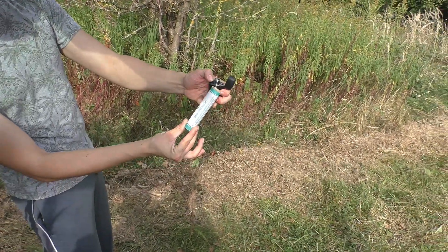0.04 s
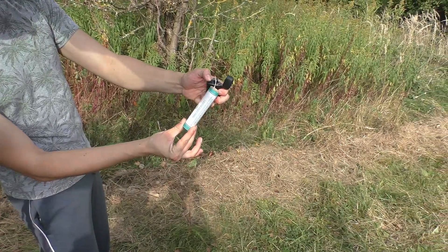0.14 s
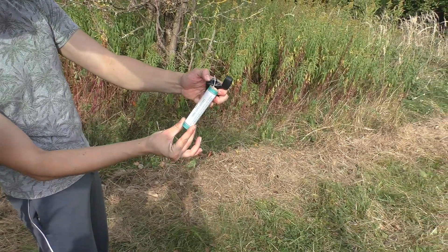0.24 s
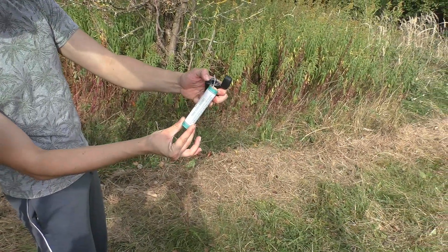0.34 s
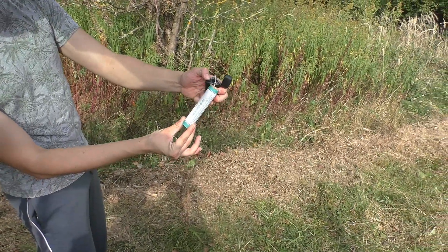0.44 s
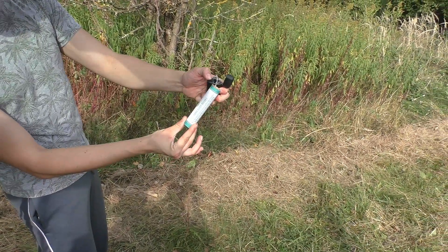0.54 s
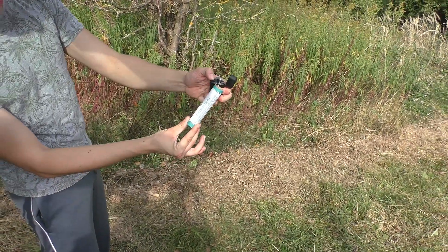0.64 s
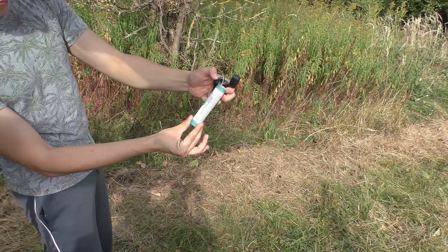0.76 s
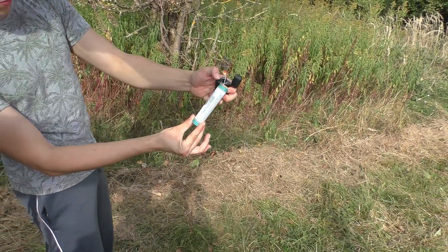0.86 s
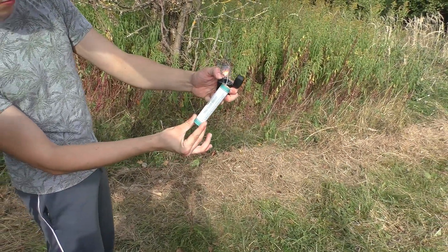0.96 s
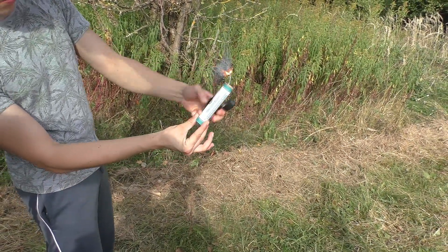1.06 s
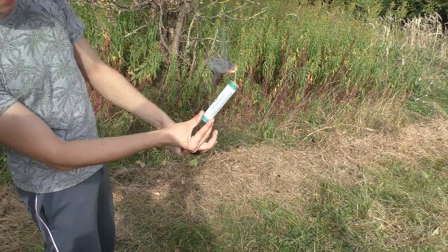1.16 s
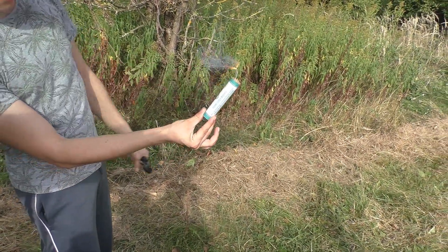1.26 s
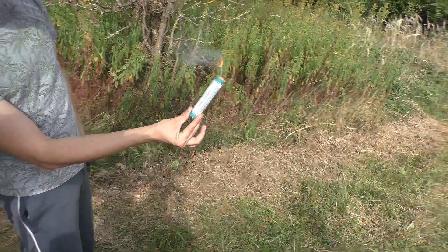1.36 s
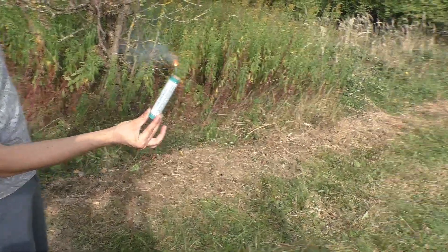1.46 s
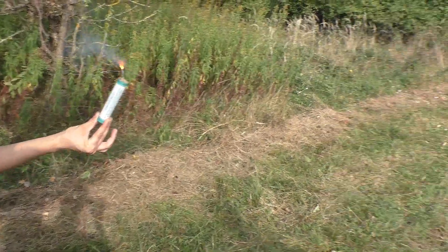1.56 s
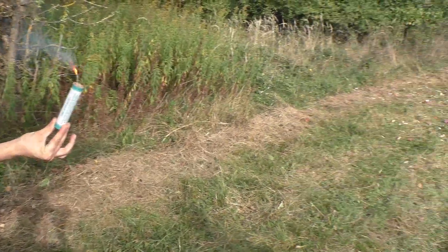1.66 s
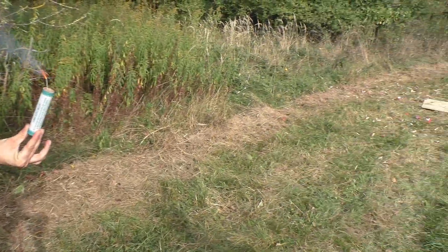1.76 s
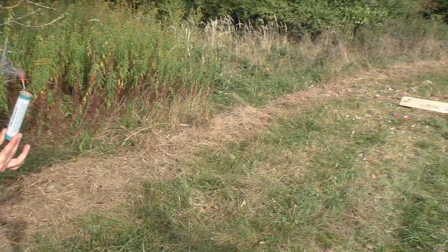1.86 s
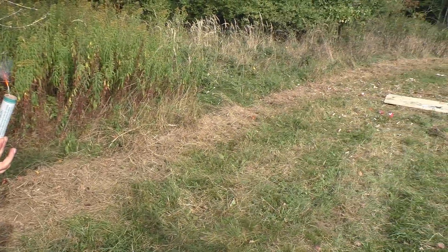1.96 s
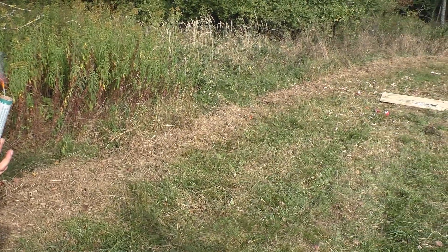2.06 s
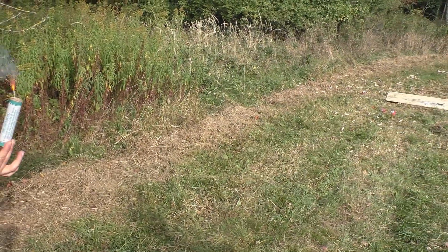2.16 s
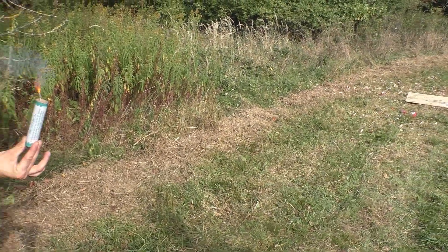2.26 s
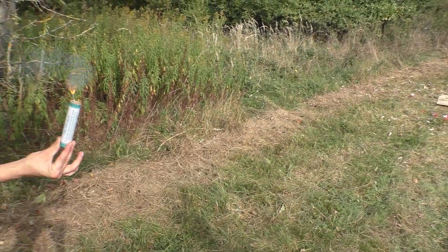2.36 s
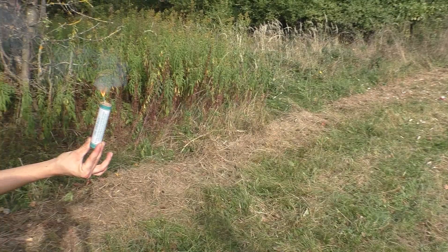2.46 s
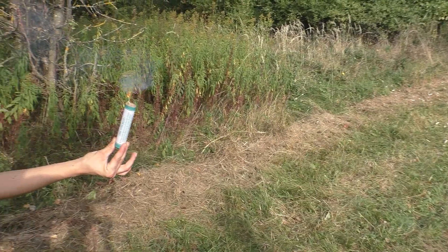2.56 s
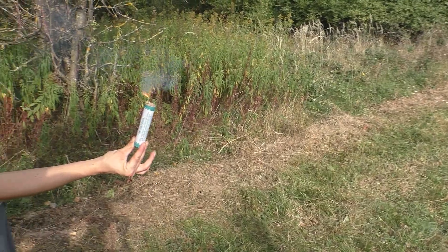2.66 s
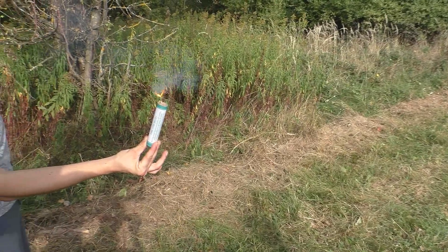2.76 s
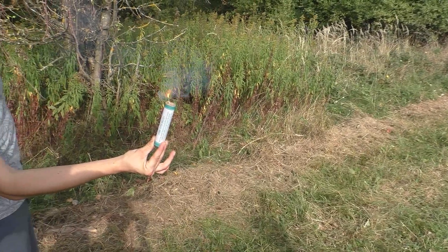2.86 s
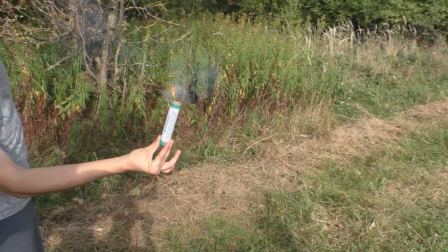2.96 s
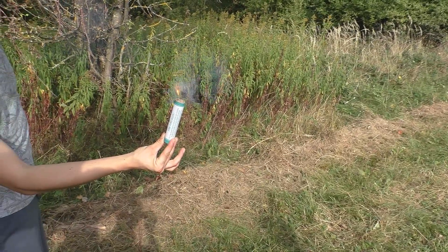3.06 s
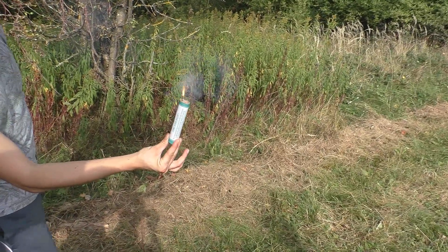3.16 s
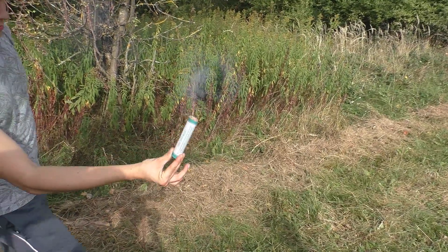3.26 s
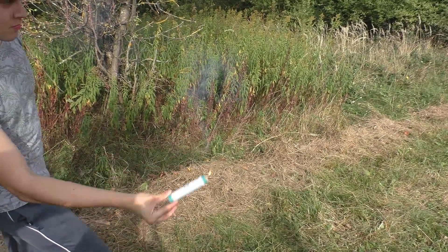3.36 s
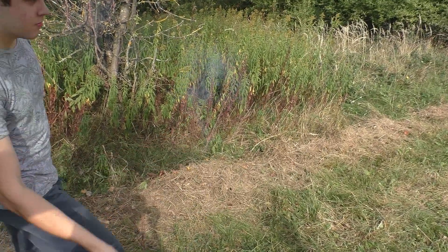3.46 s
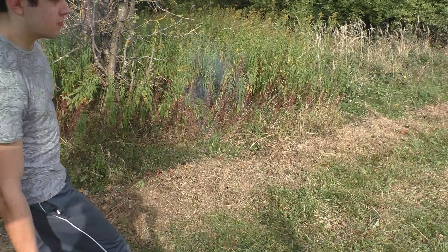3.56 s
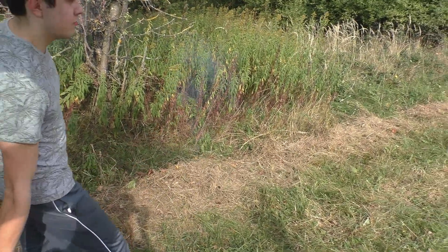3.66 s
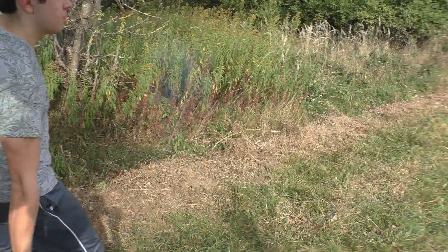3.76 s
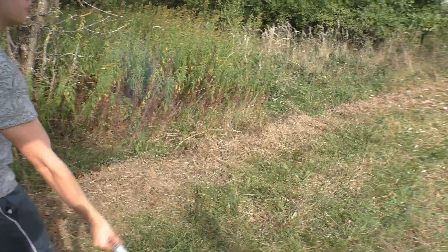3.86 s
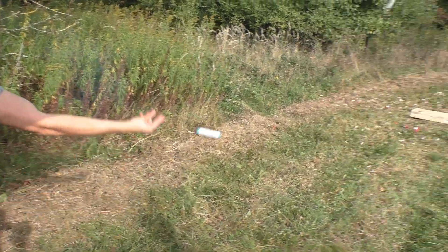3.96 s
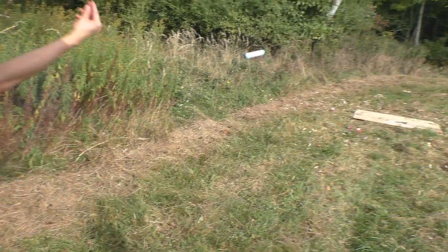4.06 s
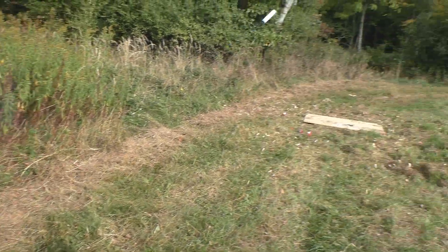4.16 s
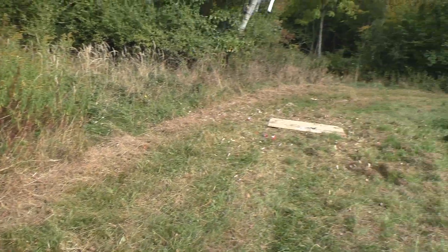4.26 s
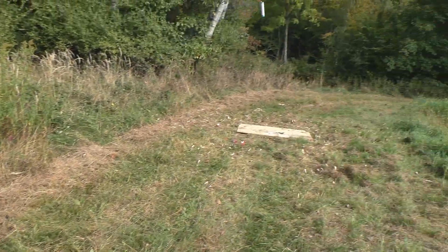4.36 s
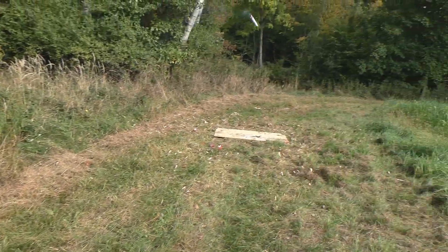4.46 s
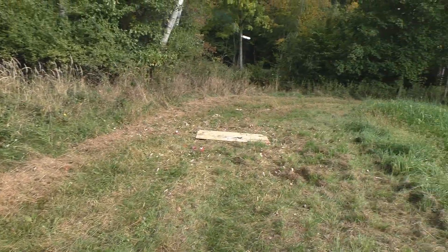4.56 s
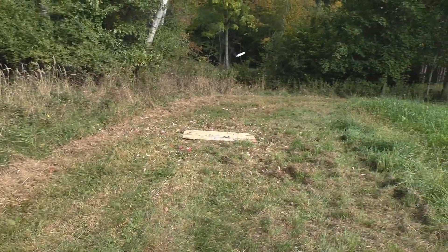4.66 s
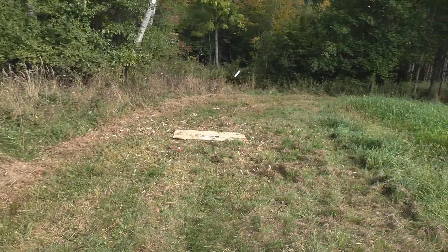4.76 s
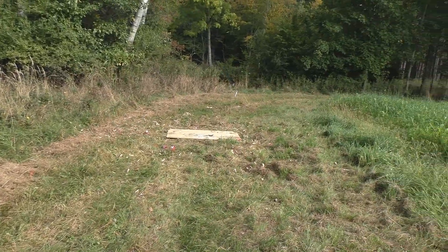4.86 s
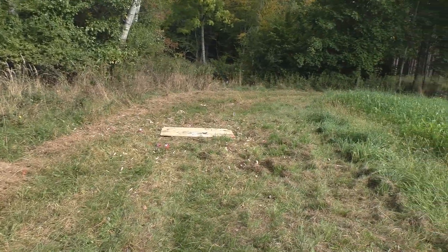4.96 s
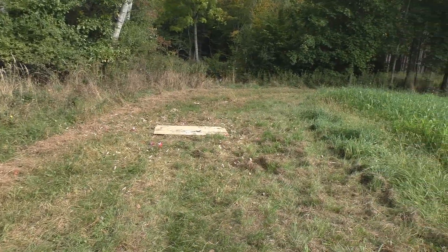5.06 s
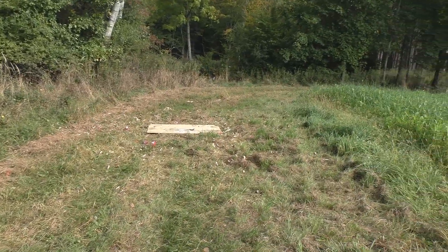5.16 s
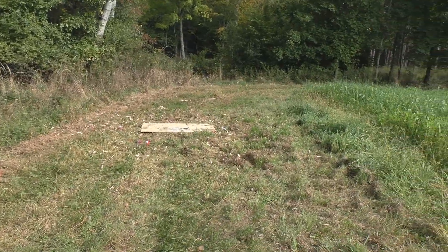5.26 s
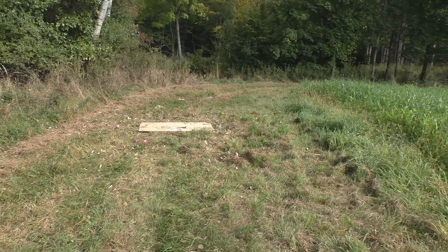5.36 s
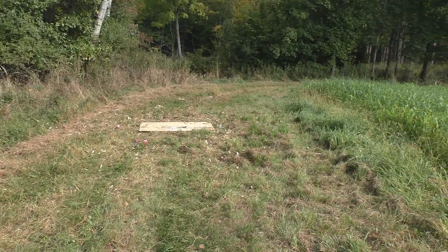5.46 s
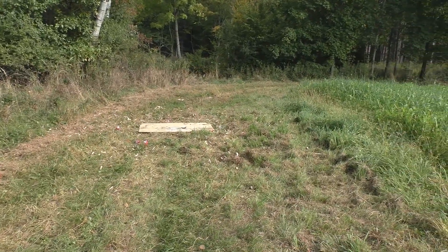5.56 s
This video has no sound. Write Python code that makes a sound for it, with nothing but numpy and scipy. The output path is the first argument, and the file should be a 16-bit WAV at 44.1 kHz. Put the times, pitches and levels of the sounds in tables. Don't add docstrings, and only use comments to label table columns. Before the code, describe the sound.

Close, dry camera sound of a hand-held firecracker being lit: one hard metallic click, a breathy torch-like rush, then a fizzing fuse with a fine sputter. The hiss has a hollow, shifting colour from a nearby reflection. After a deep whoosh from the swing it thins quickly, moving away. Grass and stems crunch underfoot, then a short low knock on earth, leaving faint hiss and field air.

```python
import sys
import numpy as np
from scipy import signal
from scipy.io import wavfile
from scipy.ndimage import uniform_filter1d

SR = 44100
rng = np.random.default_rng(int(sys.argv[2]) if len(sys.argv) > 2 else 0)


def file_out(sig):
    cols = np.atleast_2d(sig).T
    lim = np.clip(cols, -1, 1)
    pcm = np.round(lim * 32767).astype(np.int16)
    wavfile.write(sys.argv[1], SR, pcm)


def ratio_of_db(decibels):
    return 10 ** (np.asarray(decibels, float) / 20)


N = 247702


def evened(x):
    return x / np.sqrt(np.mean(abs(x) ** 2) + 1e-20)


def read(points, hz):
    f, *columns = np.transpose(points)
    return [np.interp(np.log(hz + 1), np.log(f + 1), c)[:, None] for c in columns]


def follow(rows, t):
    s, *columns = np.transpose(rows)
    return [np.interp(t, s, c) for c in columns]


def add(mix, s, sound, pan_db=0):
    part = mix[:, round(s * SR):][:, :len(sound)]
    part += sound[:part.shape[1]] * ratio_of_db(np.array([[.5], [-.5]]) * pan_db)


def band(x, lo_hz, hi_hz):
    return signal.sosfilt(signal.butter(2, [lo_hz, min(hi_hz, .45 * SR)], "bandpass", fs=SR, output="sos"), x)


def decaying(hz, db, t60, t):
    return ratio_of_db(db - 60 * t / t60) * np.sin(2 * np.pi * hz * t)


def to_sound(spectra):
    return signal.istft(spectra, SR, nperseg=1024, noverlap=768)[1][:, :N]


def turbulence(flicker_db, patchy_db, pops_per_s, pop_db):
    quick = evened(uniform_filter1d(rng.standard_normal(N), 150))
    flicker = quick + evened(uniform_filter1d(rng.standard_normal(N), 1500))
    pops = ratio_of_db(pop_db + 3.8 * np.minimum(rng.exponential(1, N), 2.2))
    pops = pops * (rng.random(N) < pops_per_s / SR)
    gust = ratio_of_db(flicker_db * flicker) + signal.lfilter([1], [1, -.93], pops)
    noise = rng.standard_normal((2, N)) * evened(gust)
    hz, t, z = signal.stft(noise, SR, nperseg=1024, noverlap=768)
    patches = uniform_filter1d(uniform_filter1d(rng.standard_normal(z.shape[::-1][:2]).T, 14, 0), 10, 1)
    return hz, t, z * ratio_of_db(patchy_db * evened(patches))


def layered(hz, colour, levels_db):
    part = np.digitize(hz, (750, 3100, 7000))
    shape = ratio_of_db(read(colour, hz)[0]) * (hz[:, None] < colour[-1][0])
    scale = [np.sqrt(np.sum(shape[part == k] ** 2) / len(hz)) for k in range(4)]
    level_db = (np.array(levels_db) - 20 * np.log10(scale)[:, None])[part]
    return shape * ratio_of_db(uniform_filter1d(level_db, size=9, axis=0, mode="nearest"))


# from t/s, until t/s, delay/ms, strength
LIMB_ECHOES = [(0.1, 0.86, 0.343, -0.081), (0.1, 0.86, 0.499, -0.193), (0.1, 0.86, 0.652, -0.066),
               (0.1, 0.86, 0.779, 0.093), (0.1, 0.86, 1.037, 0.104), (0.1, 0.86, 1.233, 0.075),
               (0.1, 0.86, 1.902, -0.06), (0.1, 0.86, 2.055, -0.062), (0.88, 1.1, 0.309, -0.184),
               (0.88, 1.1, 0.411, 0.126), (0.88, 1.1, 0.527, 0.229), (0.88, 1.1, 1.066, 0.096),
               (0.88, 1.1, 1.743, -0.114), (0.88, 1.1, 2.829, -0.082), (1.15, 1.45, 0.36, 0.105),
               (1.15, 1.45, 0.539, 0.099), (1.15, 1.45, 1.066, -0.069), (1.15, 1.45, 1.803, 0.121),
               (1.15, 1.45, 2.072, -0.079), (1.15, 1.45, 2.803, -0.066), (1.5, 1.72, 0.238, -0.203),
               (1.5, 1.72, 0.346, 0.132), (1.5, 1.72, 0.904, 0.113), (1.5, 1.72, 1.392, -0.075),
               (1.5, 1.72, 1.851, 0.097), (1.76, 2.4, 0.286, 0.106), (1.76, 2.4, 0.411, -0.169),
               (1.76, 2.4, 0.493, -0.139), (1.76, 2.4, 0.967, 0.073), (1.76, 2.4, 1.318, -0.072),
               (1.76, 2.4, 1.409, 0.086), (1.76, 2.4, 1.502, -0.073), (1.76, 2.4, 1.984, -0.067),
               (2.45, 3.28, 0.402, -0.052), (2.45, 3.28, 0.49, 0.047), (2.45, 3.28, 1.091, 0.077),
               (2.45, 3.28, 1.406, -0.058), (2.45, 3.28, 1.791, 0.05), (2.45, 3.28, 2.197, 0.059),
               (2.45, 3.28, 3.019, -0.06), (2.45, 3.28, 3.897, -0.059), (3.68, 3.84, 0.201, -0.102),
               (3.68, 3.84, 0.388, -0.128), (3.68, 3.84, 0.516, 0.148), (3.68, 3.84, 2.112, -0.094),
               (3.68, 3.84, 2.194, 0.072), (3.68, 3.84, 2.341, -0.103)]


def limbs(hz, t):
    start, until, ms, strength = np.transpose(LIMB_ECHOES)[:, :, None]
    fade_s = .05
    held = np.clip(.5 + np.minimum(t - start, until - t) / fade_s, 0, 1)
    return 1 + np.exp(-2j * np.pi * hz[:, None] * ms.T / 1000) @ (strength * held)


# t/s, delay/ms, strength 0-1
NEAR_ECHO = [(.15, .882, .6), (1, .864, .56), (1.15, .874, .66), (1.3, .862, .74), (1.5, .826, .72),
             (1.78, .772, .6), (2.28, .789, .58), (2.4, .78, .58), (2.8, .814, .63), (3.2, .814, .67),
             (3.28, .84, .55), (3.33, .885, .45), (3.39, .97, .36), (3.47, 1.17, .28), (3.55, 1.28, .4),
             (3.63, 1.4, .4), (3.68, 1.33, .38), (3.75, 1.31, .35), (3.82, 1.26, .45), (3.9, 1.29, .36),
             (3.95, 1.22, .3), (4.03, .8, .25), (4.11, .56, .15), (4.3, .25, 0)]
# f/Hz, level/dB, phase lead/rad
ECHO_COLOUR = [(850, -1, 1.25), (1400, -.5, .75), (2000, .5, .6), (3300, 3, .5), (4500, 4.6, .45),
               (5200, -1, .42), (6000, -3.5, .36), (7000, 0, .3), (9000, -3.5, .1), (10700, -5.5, -.2),
               (12300, 1.5, -.2), (15000, -1, 0)]
# t/s, delay/ms, strength
GROUND_ECHO = [
    (4.2, 4.6, 0.018),
    (4.3, 4.84, 0.71),
    (4.55, 3.7, 0.34),
    (4.7, 3.8, .02),
]
# t/s, delay/ms, strength, shaded f/Hz, shade/dB
LIGHTER_HAND = [(.1, 0.49, 0.43, 7760, -9), (.8, 0.51, 0.42, 7560, -11), (.9, 0.46, 0.16, 7600, -10),
                (1.05, 0.45, 0.037, 7600, -9), (1.09, 0.47, 0.17, 5500, -2), (1.13, 0.51, 0.022, 4600, 5),
                (1.16, 0.44, .01, 4470, 3)]


def echoes(hz, t):
    surface_db, lead = read(ECHO_COLOUR, hz)
    blocked_db = -11 * np.exp(-((hz[:, None] - 5900) / 2400) ** 4) * np.clip((1.4 - t) / .3, 0, 1)
    uneven = uniform_filter1d(uniform_filter1d(rng.standard_normal((len(t), len(hz))).T, 24, 0), 45, 1)
    near_ms, near = follow(NEAR_ECHO, t)
    near = np.clip(near * ratio_of_db(surface_db + blocked_db + 2.4 * evened(uneven)), 0, .96)
    hand_ms, hand, shade_hz, shade_db = follow(LIGHTER_HAND, t)
    ground_ms, ground = follow(GROUND_ECHO, t)
    turn = -2j * np.pi * hz[:, None] / 1000
    echo = near * np.exp(turn * near_ms + 1j * lead)
    aside = -0.38
    paths = np.array([1 + echo, 1 + aside * echo])
    paths = paths * (1 + hand * np.exp(turn * hand_ms)) * limbs(hz, t)
    paths = paths * (1 + ground * np.exp(turn * ground_ms))
    shade = ratio_of_db(shade_db * np.exp(-((hz[:, None] - shade_hz) / 800) ** 2))
    return shade * paths / np.sqrt((1 + near ** 2) * (1 + hand ** 2))


# t/s, left over right level/dB
BEARING = [(0.0, 1.5), (1.37, 1), (1.49, 1.5), (1.7, 4), (1.79, 7), (2.3, 5.5), (2.38, 3.5), (3.45, 1),
           (3.8, 8), (4.07, 2), (4.38, 2), (4.55, 3), (4.68, 13), (4.77, 7), (4.9, 5), (5.01, 7),
           (5.62, 5.5)]
# f/Hz, share
DIRECTIVITY = [(400, 0.039), (800, 0.1), (1300, 1.2), (3500, 2.1), (5000, 0.122), (8500, 0.22),
               (10000, 0.86), (14000, 1.5)]
# f/Hz, level/dB
SPREAD = [(60, -2.5), (150, -11.5), (400, -15), (700, -18), (1300, -14), (2900, -19), (4200, -14.5),
          (5600, -16.5), (6500, -40.5), (8800, -20), (10000, -16.5), (15000, -11.5)]


def heard(hz, t, direct, scattered):
    pan_db = follow(BEARING, t)[0]
    paths, aside = echoes(hz, t)
    mid = direct * paths
    lean = np.tanh(pan_db * read(DIRECTIVITY, hz)[0] * np.log(10) / 40)
    leaning = direct * aside * lean * np.exp(.6j)
    spread = ratio_of_db(read(SPREAD, hz)[0] + 0.93 * abs(pan_db))
    side = leaning + scattered * np.sqrt(abs(paths)) * spread
    return to_sound(np.array([mid + side, mid - side]))


# f/Hz, level/dB per Hz
FIELD_COLOUR = [(12, -42.5), (20, -13.5), (123, -9.5), (162, -5.5), (220, -5), (253, -7.5), (385, -9),
                (584, -24), (1510, -12), (1690, -14.5), (3030, -16), (5000, -22.5), (15700, -52)]


def field():
    hz, t, z = turbulence(flicker_db=0.0, patchy_db=1.5, pops_per_s=8, pop_db=-19)
    z = z * ratio_of_db(read(FIELD_COLOUR, hz)[0])
    side = z[1] * ratio_of_db(np.minimum(read(SPREAD, hz)[0] + 9, -1.5))
    return ratio_of_db(-54.5) * evened(to_sound(np.array([z[0] + side, z[0] - side])))


# f/Hz, level/dB, t60/s
CASE_MODES = [(2340, 1.5, 0.026), (1634, -9.5, 0.0496), (5230, -37, 0.0437), (8000, -26, 0.0547),
              (9100, -2, 0.0167), (8600, -21, 0.06), (10840, 9, 0.011), (11600, -44, 0.12),
              (10740, -13.5, 0.017), (14300, -33, 0.055)]
# f/Hz, level/dB, t60/s, delay after the blow/ms
STRIKER_MODES = [(12050, 2.5, 0.0074, 0.0052), (3420, -.5, 0.0044, 0.323), (8560, -3, 0.008, 0.495),
                 (9300, -6, 0.005, 0.303), (11075, -8, 0.011, .6), (5500, -8, 0.004, .3),
                 (5950, -13, 0.004, .35), (6950, -14, 0.0078, 0.28), (13300, -10, 0.004, 0.02),
                 (14900, -9, 0.004, 0.02)]
# t/s, ring level/dB, striker level/dB, push level/dB
CLICKS = [
    (.007, -53, -53, -68),
    (0.047, -15.5, -1.5, -42),
    (0.598, -57, -54, -74),
    (1.1174, -44, -48, -65),
]


def lighter():
    out, t = np.zeros((2, N)), np.arange(3000) / SR
    ring = sum(decaying(hz, db, t60, t) for hz, db, t60 in CASE_MODES)
    strike = sum(decaying(hz, db, t60, np.maximum(t - ms / 1000, 0)) for hz, db, t60, ms in STRIKER_MODES)
    push = band(np.sin(np.pi * np.clip((t - .001) / .0034, 0, 1)) ** 2, 60.1, 850)
    for (s, ring_db, strike_db, push_db), noise in zip(CLICKS, rng.standard_normal((len(CLICKS), 2, 3000))):
        sound = ratio_of_db(ring_db) * ring + ratio_of_db(strike_db) * strike + ratio_of_db(push_db) * push
        add(out, s, sound, 1.2)
        add(out, s + follow(NEAR_ECHO, s)[0] / 1000, 0.4 * sound, .6)
        add(out, s + .0083, ratio_of_db(-27) * sound, .6)
        scatter = ratio_of_db(strike_db) * (ratio_of_db(-9.0 - 60 * t / 0.0066) + ratio_of_db(-23.5 - 60 * t / 0.061))
        out[:, round(s * SR):][:, :3000] += band(band(noise, 1320, 15000), 1580, 15000) * scatter
    return out


# f/Hz, level/dB per Hz
JET_COLOUR = [(24, -43), (40, -9), (91, -14), (150, -17), (844, -15.5), (1200, -7), (1830, -9.5),
              (2470, -9.5), (3020, -8.5), (4730, 0.5), (7420, -8.5), (10300, -12.5), (15700, -13.5)]
# t/s, flow level/dB
FLAME = [(.08, -21), (.126, -8.5), (.168, -1), (.258, -1), (.426, -0.5), (.464, -5), (.566, -2.5),
         (.592, -6.5), (.87, -6)]
# level/dB, share of the flow
FLAME_LAYERS = [(-63.5, 1.09), (-39.5, 0.53), (-42.5, 0.85), (-46.5, 0.79)]


def jet():
    spark_s, shut_s = .05, 1.12
    cold_db = -77, -62, -60, -50.5
    hz, t, z = turbulence(flicker_db=0.16, patchy_db=0.5, pops_per_s=60, pop_db=-3)
    flow_db = follow(FLAME, t)[0]
    levels_db = [np.where(t < spark_s, cold, db + share * flow_db)
                 for cold, (db, share) in zip(cold_db, FLAME_LAYERS)]
    levels_db[3] = levels_db[3] - 1.5 * np.clip((t - .45) / .05, 0, 1)
    whistle_db = 12 * (t < spark_s) * np.exp(-((hz[:, None] - 9060) / 980) ** 2)
    valve = np.clip((shut_s - t) / 0.071, 0, 1)
    return heard(hz, t, *(z * ratio_of_db(whistle_db) * layered(hz, JET_COLOUR, levels_db) * valve))


# t/s, level/dB, f/Hz, left over right level/dB
PUFFS = [(0.592, -44, 75, 4), (0.668, -51, 88, 3), (0.728, -51, 72, 4.0), (0.79, -50, 76, 6),
         (0.937, -61, 199, 4), (3.626, -36.5, 198, -0.5), (3.748, -52, 167, 1.0), (3.899, -45, 49, 7),
         (4.099, -53, 183, -4), (4.349, -57, 199, -1.0)]


def puffs():
    out = np.zeros((2, N))
    for s, db, hz, pan_db in PUFFS:
        turns = np.arange(0, 1.8, hz / SR)
        add(out, s, -ratio_of_db(db) * np.sin(2 * np.pi * turns) * np.hanning(len(turns)), pan_db)
    return out


def beaming(hz, t):
    facing = np.exp(-((t - 2.1) / 0.45) ** 4)
    tipped = np.clip((t - 2.9) / 0.045, 0, 1)
    shaded = np.clip((1.28 - t) / .15, 0, 1)
    sheen_db = -1.5 + 2 * facing - 2.5 * tipped - 5 * shaded
    rim_db = -1 + 4.5 * facing
    return ratio_of_db(sheen_db / (1 + (13200 / (hz + 1)) ** 16) + rim_db * np.exp(-((hz - 6760) / 1770) ** 2))


# f/Hz, level/dB per Hz
FUSE_COLOUR = [(24, -52), (40, -17.5), (170, 3.5), (335, 8), (580, -3.5), (844, -9.5), (1360, -5.5),
               (1970, -8), (2660, -6.5), (3170, -11), (3780, -14), (5640, -16), (10000, -7.5), (15700, -14)]
# t/s, burn level/dB, aim of the spit at the microphone/dB
BURN = [(.87, -50, 1), (.9, -45, 5.2), (1.11, -40, 4.8), (1.21, -43.5, 3.2), (1.44, -43.5, 4.3),
        (1.61, -42.5, 8.7), (1.75, -45, 7.1), (2.08, -45.5, 6.3), (2.45, -45, 8.2), (2.76, -43.5, 6.7),
        (3.08, -42.5, 6.6), (3.36, -44.5, 6.8), (3.45, -46.5, 7.1), (3.66, -49.5, 2.8), (3.83, -47.5, 1.6),
        (4.04, -41.5, 4.9)]
# t/s, level/dB, extra spit level/dB, width/s
FLARES = [(1.485, 3, -1.5, 0.032), (2.19, 1.5, -0.4, 0.2), (2.83, 1, 0.5, 0.043), (3.039, 1, -0.5, 0.048),
          (3.409, 3.5, 0.5, 0.017), (3.55, 3, -2, 0.08), (3.92, 3, -2, 0.079), (4.24, -2, 1.5, 0.056),
          (4.6, 0.5, 1.5, 0.064), (4.87, -6.5, 3, 0.027), (5.03, -3.5, 2.5, 0.073), (5.22, 6.5, 0.5, 0.063),
          (5.33, -1, 10, 0.047)]
# level/dB, share of aim, catching/dB, swung/dB, dB per tenfold distance
FUSE_LAYERS = [(-8, 0.5, -3, 7.5, -13), (0.64, -0.065, 1, -0.9, -14), (0.5, -0.45, 6.5, 0.5, -17.5),
               (0.26, 1, -0.5, 4, -20.5)]


def fuse():
    throw_s, down_s, arm_m, away_m_per_s = 3.708, 4.93, 0.66, 5.57
    hz, t, z = turbulence(flicker_db=0.1, patchy_db=1.54, pops_per_s=140, pop_db=-11)
    burn_db, aim_db = follow(BURN, t)
    for s, db, spit_db, width in FLARES:
        flare = np.exp(-((t - s) / width) ** 2)
        burn_db = burn_db + db * flare
        aim_db = aim_db + spit_db * flare
    burn_db = burn_db - 9 * np.clip((t - down_s) / 0.1, 0, 1)
    catching = np.exp(-np.maximum(t - 0.97, 0) / 0.14)
    swung = np.exp(-((t - 3.787) / 0.21) ** 4)
    far = np.log10(1 + away_m_per_s * (np.clip(t, throw_s, down_s) - throw_s) / arm_m)
    levels_db = [burn_db + db + share * aim_db + catch_db * catching + swing_db * swung + far_db * far
                 for db, share, catch_db, swing_db, far_db in FUSE_LAYERS]
    levels_db[0] = levels_db[0] - 4 * np.clip(2.1 - t, 0, .7) / .7
    lit = np.clip((t - .86) / 0.034, 0, 1)
    return heard(hz, t, *(z * beaming(hz[:, None], t) * layered(hz, FUSE_COLOUR, levels_db) * lit))


# t/s, peak level/dB, f/Hz, t60/s
TAPS = [(1.1175, -21, 2150, .016), (1.1178, -33, 4500, .012), (4.6738, -34, 1220, .022),
        (4.773, -47, 4900, .02), (4.774, -46, 6300, .02), (4.776, -49, 7400, .015), (4.677, -52, 7400, .05),
        (4.612, -49, 6800, .03), (4.717, -49, 4500, .02), (5.162, -41, 9200, .008),
        (5.162, -42, 3200, .012), (5.1645, -42, 2800, .01), (5.1662, -35, 1500, .007),
        (5.1697, -33, 2100, .007), (5.1699, -37, 3600, .006), (5.169, -42, 5900, .008),
        (5.1725, -43, 6700, .01), (5.1728, -41, 3300, .006), (5.1722, -34, 1050, .012),
        (5.1845, -45, 4200, .005)]


def taps():
    out, t = np.zeros((2, N)), np.arange(1200) / SR
    for (s, db, hz, t60), noise in zip(TAPS, rng.standard_normal((len(TAPS), 1200))):
        tone = np.sin(2 * np.pi * hz * t) + .55 * band(noise, 1000, 15000)
        add(out, s, ratio_of_db(db + 3 - 60 * t / t60) * tone * np.minimum(t / .0005, 1), 1.0)
    return out


# t/s, peak level/dB, f/Hz, t60/s, left over right level/dB
SNAPS = [(3.522, -35, 2600, 0.022, 0), (3.535, -36, 4200, .04, 3), (3.553, -34, 2320, 0.05, 7),
         (3.556, -37, 5200, .03, 3), (3.569, -36, 5060, .04, 3), (3.583, -35, 3460, 0.02, 5),
         (3.626, -35, 2000, .02, 6), (4.899, -46, 2680, 0.025, 14.5), (5.224, -51, 1750, 0.022, -10),
         (5.266, -47, 1800, 0.02, 0), (5.281, -45, 3000, 0.04, 4), (5.347, -38, 3700, 0.011, 5),
         (5.561, -41, 2800, 0.017, 4)]
# t/s, weight level/dB
STEP = [(4.581, -66), (4.628, -44), (4.668, -51), (4.68, -44.5), (4.74, -42), (4.76, -50), (4.82, -49),
        (4.835, -71), (4.859, -68)]


def grass():
    out, t = np.zeros((2, N)), np.arange(2500) / SR
    for (s, db, hz, t60, pan_db), noise in zip(SNAPS, rng.standard_normal((len(SNAPS), 2500))):
        snap = evened(band(band(noise, .75 * hz, 1.7 * hz), .75 * hz, 1.7 * hz)) + .25 * noise
        add(out, s, ratio_of_db(db - 3.0 - 60 * t / t60) * snap * np.minimum(t / 0.00043, 1), pan_db)
    t = np.arange(STEP[0][0], STEP[-1][0], 1 / SR)
    breaks = ratio_of_db(2.2 * np.minimum(rng.exponential(1, len(t)), 3)) * (rng.random(len(t)) < .1)
    grains = rng.standard_normal((3, len(t))) * breaks
    low_db = follow(STEP, t)[0]
    high_db = -49.5 + 0.54 * (low_db - low_db.max())
    fade = signal.windows.tukey(len(t), .2)
    add(out, t[0], fade * ratio_of_db(low_db - 13.0) * evened(band(band(grains[0], 880, 3000), 790, 3200)), 7)
    add(out, t[0], fade * ratio_of_db(low_db - 9.0) * evened(band(grains[1], 430, 3300)), -7)
    add(out, t[0], fade * ratio_of_db(high_db - 7.5) * evened(band(grains[2], 6000, 7200)), 2.5)
    return out


# t/s, peak level/dB, f/Hz, left over right level/dB
STEM_CRACKS = [(4.61, -53, 2550, 2.5), (4.632, -49, 1830, 3.5), (4.673, -37, 1250, 10),
               (4.675, -41, 1900, 10), (4.679, -40.5, 2550, 15), (4.688, -42, 2700, 16),
               (4.693, -49, 1500, 10), (4.698, -44, 2600, 14), (4.704, -36, 1930, 14),
               (4.711, -48, 1210, 8), (4.717, -35.5, 1800, 15), (4.722, -39, 1170, 5), (4.73, -48, 1270, 5),
               (4.737, -42, 1810, 12), (4.749, -48, 1120, 4.5), (4.771, -43.5, 2630, 21),
               (4.779, -45, 2690, 12), (4.791, -49, 2210, 5.0), (4.801, -43, 2700, 9),
               (4.816, -49, 1210, 2.0)]


def stems():
    out, t = np.zeros((2, N)), np.arange(2000) / SR
    for (s, db, hz, pan_db), noise in zip(STEM_CRACKS, rng.standard_normal((len(STEM_CRACKS), 2000))):
        rough = evened(band(band(noise, .78 * hz, 1.3 * hz), .78 * hz, 1.3 * hz))
        crack = .2 * band(noise, 1000, 7500) * ratio_of_db(-60 * t / .012)
        stem = np.sin(2 * np.pi * hz * t) + .6 * rough + crack
        add(out, s, ratio_of_db(db - 60 * t / .028) * stem * np.minimum(t / 0.0011, 1), pan_db)
    return out


# f/Hz, level/dB, t60/s
SOIL_MODES = [(265, -3.5, 0.061), (232, -14.5, 0.17), (305, -11, 0.11), (389, -18, 0.12), (690, -8, 0.074)]
# t/s, level/dB
THUDS = [
    (5.1735, -22),
    (5.1783, -40),
    (5.183, -20.5),
    (5.217, -38),
    (5.255, -48),
    (5.279, -57),
]


def landing():
    out, t = np.zeros((2, N)), np.arange(12000) / SR
    thud = sum(decaying(hz, db, t60, t) for hz, db, t60 in SOIL_MODES)
    for s, db in THUDS:
        add(out, s, ratio_of_db(db) * band(thud * np.minimum(t / 0.00039, 1), 120, 425), .4)
    crush = band(rng.standard_normal(1500), 720, 13000) * np.hanning(1500) ** .5
    add(out, 5.1615, ratio_of_db(-34.5) * crush * ratio_of_db(-60 * t[:1500] / 0.091), 1.0)
    boom_hz, boom_db, boom_t60 = 130, -43, .55
    boom = evened(band(rng.standard_normal(len(t)), .65 * boom_hz, 1.5 * boom_hz))
    add(out, THUDS[0][0], ratio_of_db(boom_db - 60 * t / boom_t60) * boom * np.minimum(t / .06, 1))
    return out


def scene():
    held = lighter() + jet() + fuse() + taps()
    around = field() + puffs() + grass() + stems() + landing()
    return held + around


def low_pass(x):
    return signal.sosfilt(signal.butter(12, 17070, fs=SR, output="sos"), x)


# f/Hz, level/dB
MICROPHONE = [(150, 1), (260, -0.5), (400, 0.5), (475, 2.5), (560, -0.5), (870, -1.5), (970, 1), (1300, 0)]


def record(dry):
    hz = np.linspace(0, SR / 2, 2049)
    colour = signal.firwin2(2047, hz, ratio_of_db(read(MICROPHONE, hz)[0][:, 0]), fs=SR)
    limited = .76 * np.tanh(signal.oaconvolve(dry, colour[None], "same") / .83)
    edge = signal.firwin(511, 15850, window=("kaiser", 9), fs=SR)
    mix = signal.oaconvolve(limited, edge[None], "same")
    return low_pass(mix)


dry = scene()
out = record(dry)
file_out(out)
```